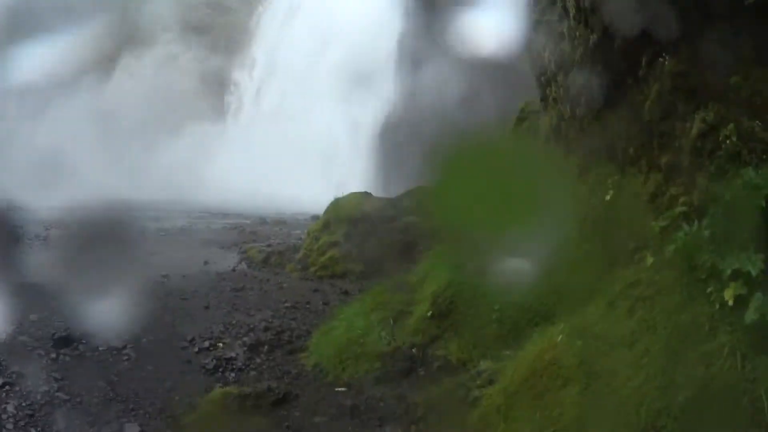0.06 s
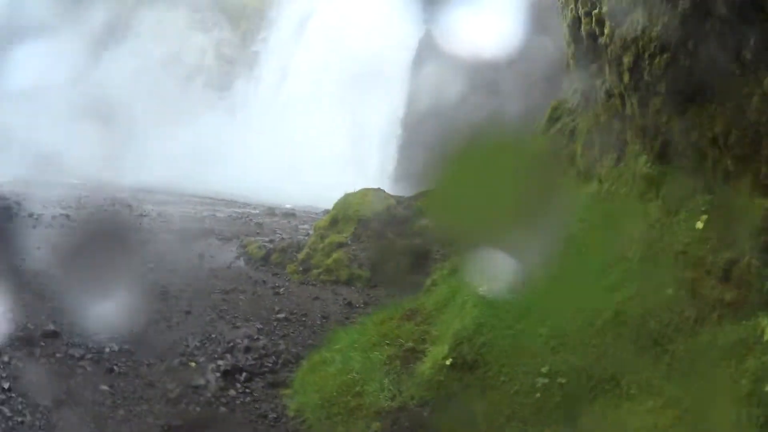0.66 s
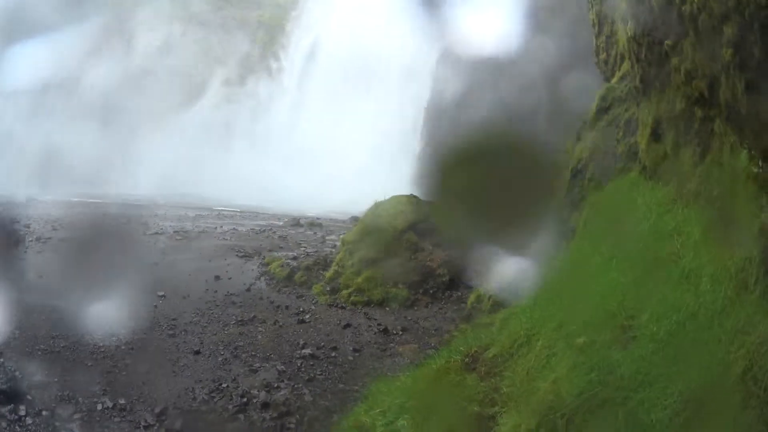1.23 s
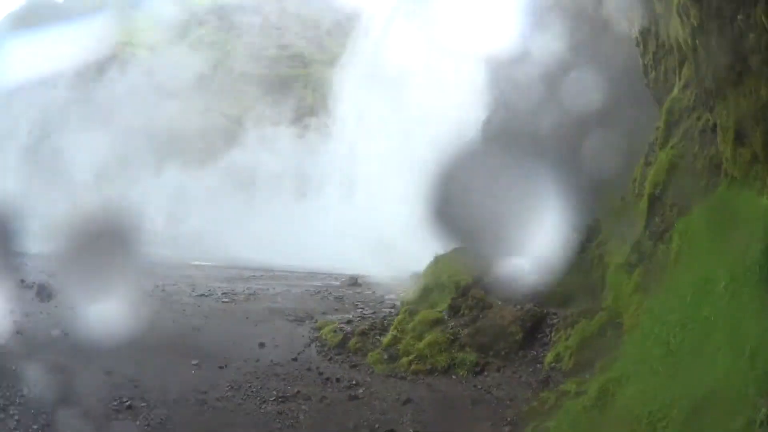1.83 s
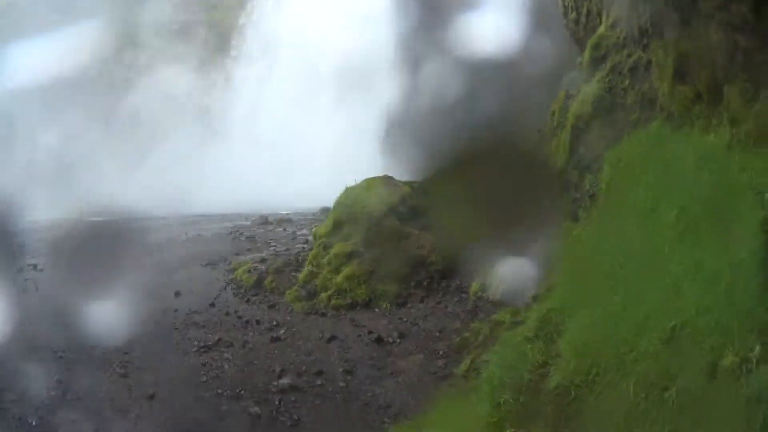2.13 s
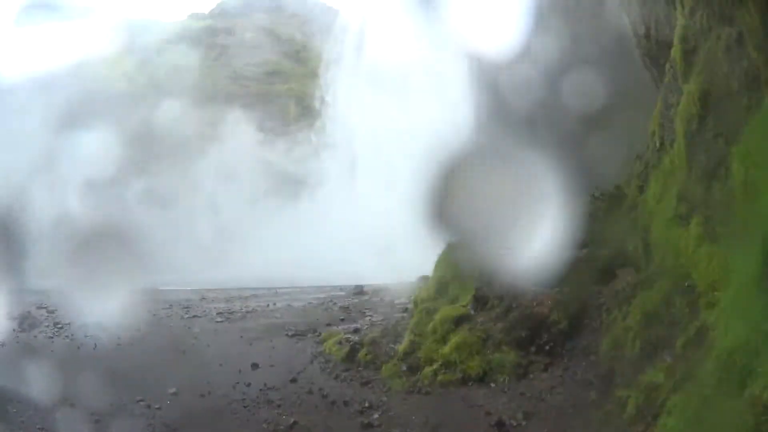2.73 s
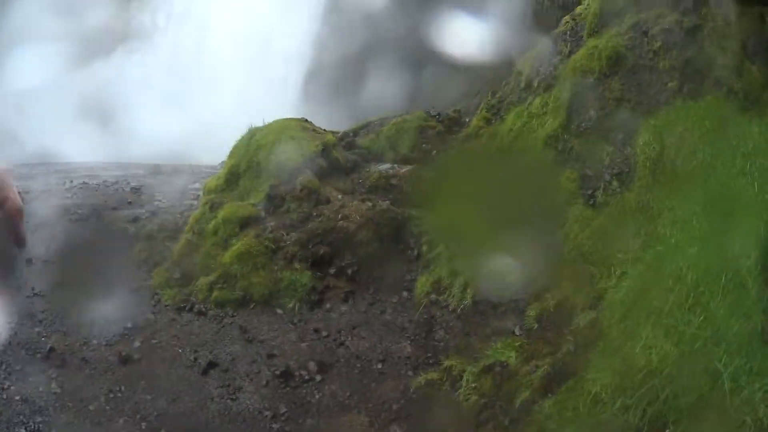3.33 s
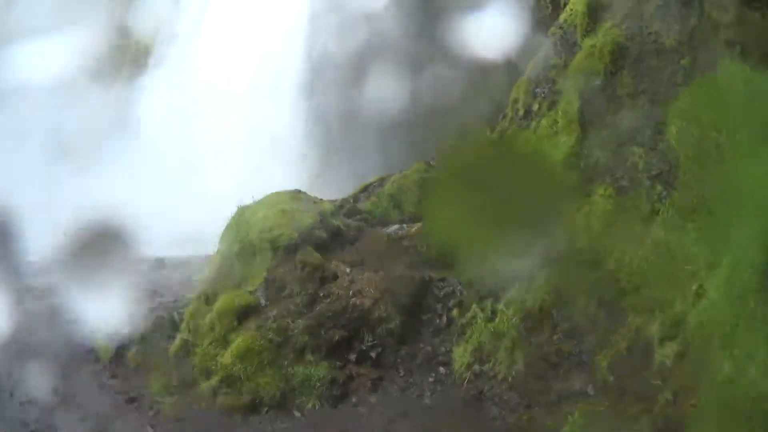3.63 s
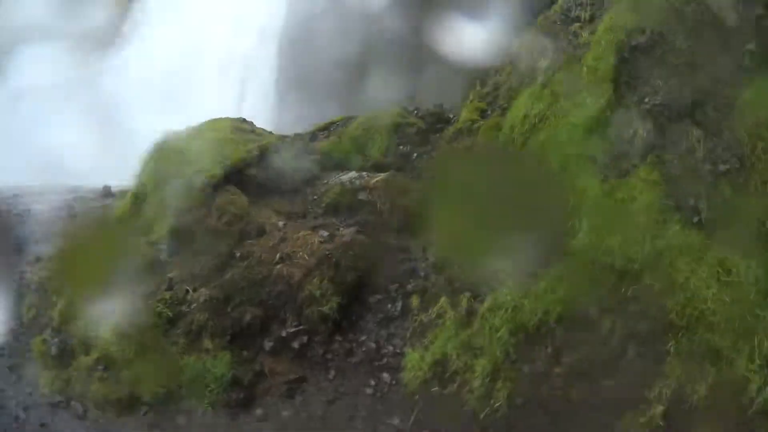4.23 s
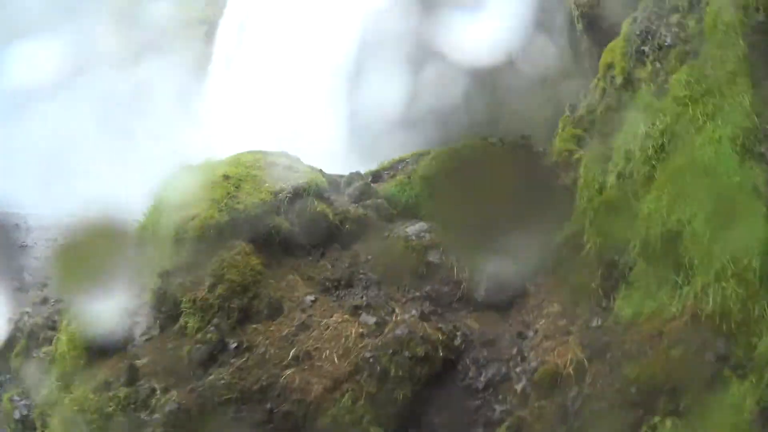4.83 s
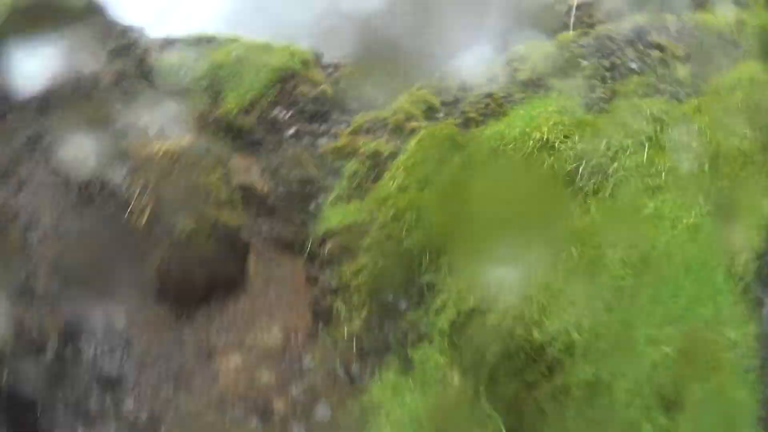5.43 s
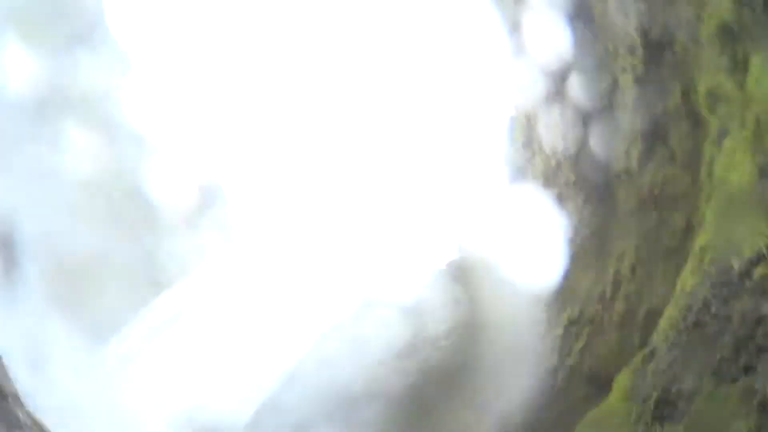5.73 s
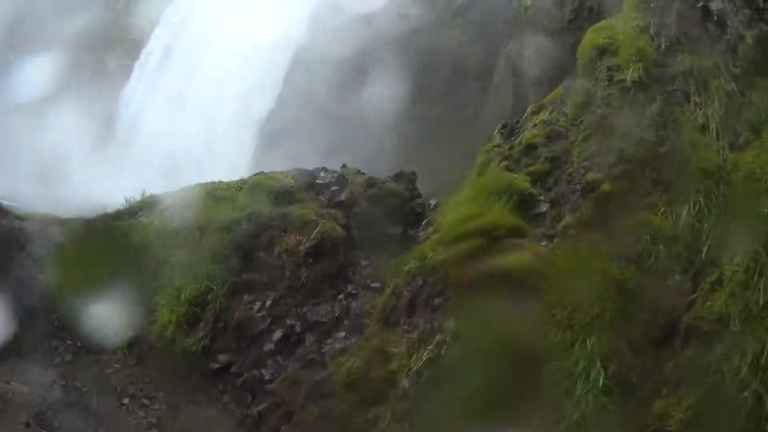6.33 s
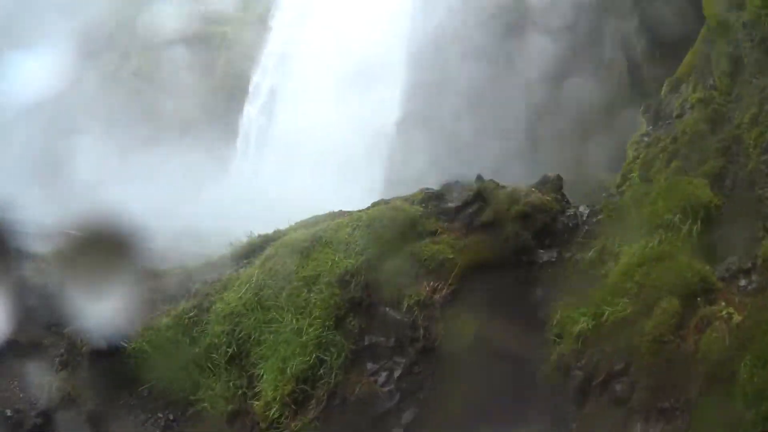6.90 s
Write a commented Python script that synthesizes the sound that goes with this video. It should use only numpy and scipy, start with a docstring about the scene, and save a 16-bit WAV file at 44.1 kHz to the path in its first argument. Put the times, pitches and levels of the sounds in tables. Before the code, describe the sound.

A large waterfall pounds into its pool close to a hand-held microphone outdoors. A low roar lies under a loud, dense hiss with a slightly hollow, ringing colour. It grows a little in the first half second, then holds throughout, the roar slightly fuller near 3.7 seconds. Fine, high spray swells gently about once a second. The hand gives a soft knock at 0.7 seconds and two more with a light scuff near 1.2 seconds. A faint puff of wind touches the microphone at 4 seconds. From about 5.1 to 5.7 seconds the grip changes: a low gust buffets the microphone, several soft knocks and finger rubs follow, and a wet finger gives two quick, high, raspy squeaks on the left around 5.5 seconds. The tone of the hiss wavers with this handling, then the water rushes on until the end, near 7 seconds.

```python
"""At the pool of a large waterfall, close by, on the two microphones of a hand-held camera.
The water pounds in: a low roar under a dense hiss and swells of fine spray, heard through the camera's case.
The case rings at a few resonances, which shift when the hand changes grip and swings the camera upward.
Right at the microphones, the hand adds soft knocks, a finger scuffs and squeaks,
and short gusts of spray-wind buffet the pair."""
import sys
import numpy as np
from scipy import signal
from scipy.io import wavfile
from scipy.ndimage import uniform_filter1d

SR = 44100
rng = np.random.default_rng(int(sys.argv[2]) if len(sys.argv) > 2 else 0)


def unload_wav(signal):
    """Save mono or channel-first audio to the path in sys.argv[1] as 16-bit WAV at rate SR, clipped to [-1, 1]."""
    wavfile.write(
        sys.argv[1],
        SR,
        np.round(np.clip(np.atleast_2d(signal).T, -1, 1) * 32767).astype(np.int16),
    )


N = 307068
FRAME, HOP = 1024, 256  # samples
HZ = np.fft.rfftfreq(FRAME, 1 / SR)
FRAME_S = np.arange(N // HOP + 5) * HOP / SR
TIME = np.arange(N) / SR


def gain_of(db):
    """Decibels to amplitude."""
    return 10 ** (np.asarray(db) / 20)


def unit_rms(x):
    """Scales to rms 1."""
    return x / np.sqrt(np.mean(x ** 2) + 1e-20)


def bell(t, middle, half):
    """A smooth rise and fall of height 1."""
    return np.exp(-np.minimum(((t - middle) / half) ** 2, 50))


def over_hz(points):
    """A spectrum read at every bin, on a log-frequency axis."""
    hz, value = np.transpose(points)
    return np.interp(np.log(HZ + 1), np.log(hz + 1), value)


def panned(sound, balance_db):
    """Spreads a sound over the microphones; a positive balance favours the left."""
    return gain_of([[balance_db / 2], [-balance_db / 2]]) * sound


def noise_pair(coherence):
    """Random short-time spectra for two microphones, from unrelated (0) to alike (1)."""
    a, b, c, d = rng.standard_normal((4, len(FRAME_S), len(HZ)))
    left = a + 1j * b
    right = coherence * left + np.sqrt(1 - coherence ** 2) * (c + 1j * d)
    return np.array([left, right])


def patches(frames, bins):
    """Random blotches of rms 1 over time and frequency."""
    field = rng.standard_normal((len(FRAME_S), len(HZ)))
    return unit_rms(uniform_filter1d(uniform_filter1d(field, frames, 0), bins, 1))


def drift(samples):
    """A random wander of rms 1, smooth over so many samples."""
    return unit_rms(uniform_filter1d(rng.standard_normal(N), samples))


def to_sound(spectra):
    """Short-time spectra to a stereo sound whose mid signal has rms 1."""
    x = signal.istft(spectra.swapaxes(1, 2), nperseg=FRAME, noverlap=FRAME - HOP)[1][:, :N]
    return x / np.std(x.mean(0))


def waterfall(rms_db=-18, roar_top_hz=800, spray_from_hz=7000, swell_in_hiss=0.13, settle_s=0.4):
    """Countless impacts merge into noise; clumps of water make it surge, pound and flicker."""
    # the falling water's spectrum: (frequency [Hz], relative level [dB])
    water_spectrum = [(20, -15), (70, -5), (140, -8.5), (240, -5.5), (400, -9), (650, -12.5), (1050, -13),
                      (1250, -9.5), (2800, .5), (5000, -3), (6500, -5.5), (7300, -11), (9000, -15),
                      (11000, -18.5)]
    # how alike the two microphones hear it: (frequency [Hz], coherence [0-1])
    coherence = [(20.0, 0.99), (500.0, 0.94), (850.0, 0.65), (1350.0, 0.86), (1750.0, 0.91), (2150.0, 0.54),
                 (2600.0, 0.59), (3200.0, 0.89), (3750.0, 0.59), (4550.0, 0.7), (5300.0, 0.38),
                 (5800.0, 0.81), (6800.0, 0.49), (10000.0, 0.72)]
    t = FRAME_S[:, None]
    roar_share = 1 / (1 + (HZ / roar_top_hz) ** 4)
    spray_share = 1 - 1 / (1 + (HZ / spray_from_hz) ** 10)
    hiss_share = 1 - roar_share - spray_share
    swell_db, spray_db = spray()
    shade_db = -0.3 * bell(t, 5.5, 1.0)  # the hand and a mossy rock shade the hiss as the camera nears
    hiss_db = shade_db + swell_in_hiss * (swell_db - swell_db.mean())
    level_db = over_hz(water_spectrum) + hiss_share * hiss_db + spray_share * spray_db
    level_db -= 3.5 * (1 - spray_share) * np.exp(-t / settle_s)  # the falls grow louder, then hold
    # the roar peaks as the camera is carried past; the ground's echo rises in pitch and strength with it
    passing = bell(t, 3.7, 1.48)
    echo_hz = 165 + 125 * passing
    echo_band = np.exp(-(np.log2((HZ + 1) / echo_hz) / 0.56) ** 2)
    level_db += (-0.96 + 1.1 * passing) * roar_share
    level_db += (2 + 1.5 * passing) * echo_band
    level_db += roar_share * patches(frames=8, bins=6)  # heavy masses hit the pool
    level_db += 0.24 * patches(frames=18, bins=24)  # clumps
    level_db += 0.59 * patches(frames=4, bins=90)  # splashes
    level_db += 0.37 * patches(frames=3, bins=500)  # whole sheets of water land at once
    spectra = noise_pair(over_hz(coherence)) * gain_of(level_db) * camera_case()
    return gain_of(rms_db) * to_sound(spectra)


def spray(rest_db=-2.5, rest_balance_db=3):
    """Fine spray hisses on the left and swells about once a second: (rise, level at each side) in dB."""
    # swells of spray: (middle [s], half length [s], rise [dB], shift to the right [dB])
    swells = [(.8, .3, 2.5, 4), (1.28, .2, 4, 1.5), (1.87, 0.39, 5, 3), (2.83, 0.35, 4.5, 3.5),
              (3.803, 0.35, 4, .3), (4.86, 0.17, 2.2, 2), (5.93, 0.28, 4, 1.2), (6.75, 0.47, 4.1, 2)]
    swell_db, balance_db = 0, rest_balance_db
    for s, half, rise_db, shift_db in swells:
        swell = bell(FRAME_S[:, None], s, half)
        swell_db += rise_db * swell
        balance_db -= shift_db * swell
    return swell_db, rest_db + swell_db + np.array([balance_db, -balance_db]) / 2


def resonances_db(resonances):
    """Bell-shaped peaks and dips at the left and right microphone."""
    return sum(np.array([[[left_db]], [[right_db]]]) / (1 + (2 * (HZ - hz) / width) ** 2)
               for hz, width, left_db, right_db in resonances)


def camera_case(first_rocking_hz=2110, second_rocking_hz=2230, rocking_width_hz=200):
    """The ringing case gives each microphone a colour and phase that move with the grip."""
    # case resonances in each grip: (frequency [Hz], width [Hz], left [dB], right [dB])
    first_grip = [(995, 57, 0.5, 5), (1295, 195, 9.5, 10.5), (1638, 550, 15, 15), (2020, 210, 6.5, -5),
                  (3450, 230, 0.4, -7.5), (4494, 510, 8, 2.5), (5350, 260, -3.5, -5.4), (5860, 630, 7, 1.5),
                  (8000, 550, 2, 2)]
    second_grip = [(1228, 620, 10.5, 12.0), (1720, 133, 7, 7.5), (2140, 430, 9.5, 3),
                   (3480, 520.0, 0, -2.3), (4630, 950, 5, 2), (5730, 300.0, -1.5, -1.5),
                   (6090, 880, 6.5, 1.5), (8110.0, 600, 1.5, 0.5)]
    # the hand's hold: (time [s], share of the second grip [0-1])
    grip_changes = [(0, 0.02), (5.12, 0.03), (5.21, 1), (5.39, 0), (5.52, 1), (5.68, 0.25), (5.87, 0.96),
                    (6.96, 0.73)]
    # phase between the microphones, rocking aside: (frequency [Hz], lead of the left [rad])
    left_lead = [(20.0, -0.77), (400.0, 0.93), (950.0, 1.2), (1150.0, 0.73), (1700.0, 1.3), (2700.0, 1.06),
                 (4000.0, 0.6), (5250.0, 0.017), (5600.0, -0.15), (7000.0, -0.71), (7550.0, 0.73),
                 (8100.0, -0.16), (9800.0, -0.44), (11000.0, 0.15)]
    grip = np.interp(FRAME_S, *np.transpose(grip_changes))[:, None]
    colour_db = (1 - grip) * resonances_db(first_grip) + grip * resonances_db(second_grip)
    # one rocking resonance drives the two microphones in opposite directions
    rocking_hz = first_rocking_hz + grip * (second_rocking_hz - first_rocking_hz)
    lead = over_hz(left_lead) + np.pi + 2 * np.arctan(2 * (HZ - rocking_hz) / rocking_width_hz)
    return gain_of(colour_db) * np.exp(1j * np.array([lead, -lead]) / 2)


def knocks(rise_cycles=0.082, ring_cycles=0.81):
    """Each knock swings the hand-damped case for a cycle or two; hard, high taps start fastest."""
    # the hand's taps on the case: (time [s], level [dB], pitch [Hz], left over right [dB])
    taps = [(0.7278, -14, 169, -4), (1.1885, -16.5, 135, -.5), (1.2466, -7.5, 760, -2),
            (5.17, -14, 202, -5), (5.1773, -11, 300, -2), (5.388, -15.5, 328, -8), (5.514, -14, 360, 10),
            (5.538, -12, 780, 3), (5.553, -18, 500, 2), (5.657, -14, 205, -10)]
    out = np.zeros((2, N))
    for s, db, hz, balance_db in taps:
        cycles = hz * np.maximum(TIME - s, 0)
        rise = 1 - np.exp(-cycles / rise_cycles)
        decay = np.exp(-np.minimum(cycles / ring_cycles, 50))
        out += panned(gain_of(db) * rise * decay * np.sin(2 * np.pi * cycles), balance_db)
    return out


def scuffs():
    """Skin rubbing on the case gives short bands of noise."""
    # finger rubs: (middle [s], half length [s], level [dB], centre [Hz], width [Hz], left over right [dB])
    rubs = [(1.233, .06, -33, 800, 640, 8), (5.28, 0.34, -40, 660, 720, 0),
            (5.541, 0.018, -25, 810, 480, 5), (5.54, 0.034, -27, 6530, 500, 1),
            (5.59, 0.033, -29, 3400, 420, 0)]
    out = np.zeros((2, N))
    for s, half, db, hz, width, balance_db in rubs:
        band = signal.butter(2, [hz - width / 2, hz + width / 2], "band", fs=SR, output="sos")
        friction = unit_rms(signal.sosfilt(band, rng.standard_normal(N)))
        out += panned(gain_of(db) * bell(TIME, s, half) * friction, balance_db)
    return out


def wind(lumpy_db=2.0, rise_db_per_s=200, fall_db_per_s=92):
    """Eddies push on each microphone in low, uneven lumps; each gust rises fast, holds and dies down."""
    # wind rumble on the microphones: (frequency [Hz], relative level [dB])
    rumble = [(10, -14), (30, 6), (60, 6), (110, -14), (250, -20), (600, -30), (2000, -70)]
    # gusts of spray-wind: (full strength from [s], hold [s], level [dB])
    gusts = [(4.04, .03, -35), (5.206, 0.35, -33.5), (5.5, .05, -45)]
    turbulence = noise_pair(coherence=0.74)
    eddies = to_sound(turbulence * gain_of(over_hz(rumble) + lumpy_db * patches(frames=5, bins=12)))
    force = np.zeros(N)
    for s, hold, db in gusts:
        before, after = np.maximum(s - TIME, 0), np.maximum(TIME - s - hold, 0)
        force += gain_of(db - rise_db_per_s * before - fall_db_per_s * after)
    return eddies * force


def squeaks(pitch_hz=2490, slips_per_s=170, slip_depth=0.51):
    """A wet finger sticks and slips, making the case sing briefly with a rasp, mostly on the left."""
    # strokes of the finger: (middle [s], half length [s], level [dB])
    strokes = [(5.525, 0.02, -23), (5.579, 0.029, -16.5)]
    slips = np.cumsum(slips_per_s * (1 + 0.34 * drift(samples=300))) / SR
    cycles = np.cumsum(pitch_hz * (1 + 0.045 * drift(samples=70))) / SR
    rasp = 1 + slip_depth * np.cos(2 * np.pi * slips)
    pressure = sum(gain_of(db) * bell(TIME, s, half) for s, half, db in strokes)
    return panned(pressure * rasp * np.sin(2 * np.pi * cycles), balance_db=11)


def scene():
    """The waterfall, with wind and handling noise on the camera."""
    return waterfall() + wind() + knocks() + scuffs() + squeaks()


def record(dry):
    """The recorder rounds off the tallest peaks, then limits the band."""
    knee, headroom, top_hz = 0.65, 0.22, 11080
    excess = np.maximum(abs(dry) - knee, 0)
    rounded = dry - np.sign(dry) * (excess - headroom * np.tanh(excess / headroom))
    lowpass = signal.firwin(1023, top_hz, window=("kaiser", 9), fs=SR)
    return signal.oaconvolve(rounded, lowpass[None], "same")


dry = scene()
out = record(dry)
unload_wav(out)
```